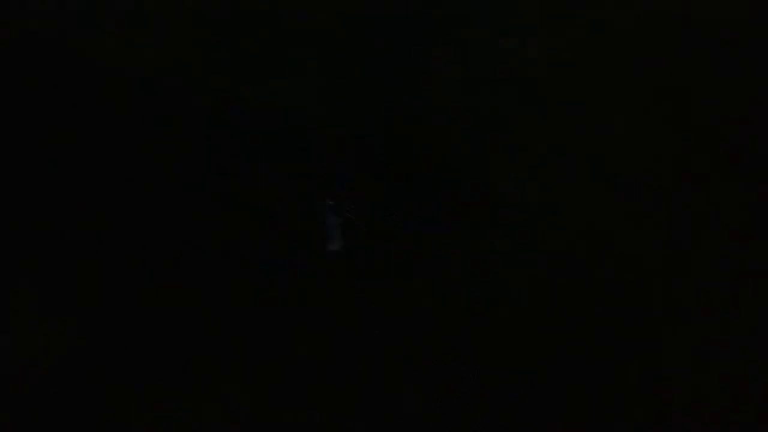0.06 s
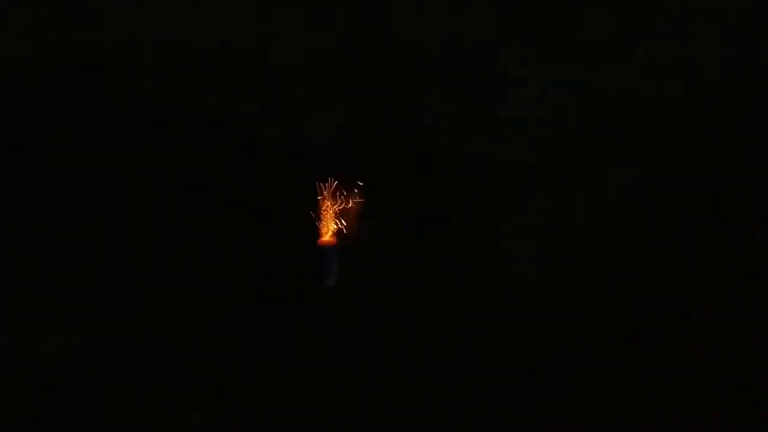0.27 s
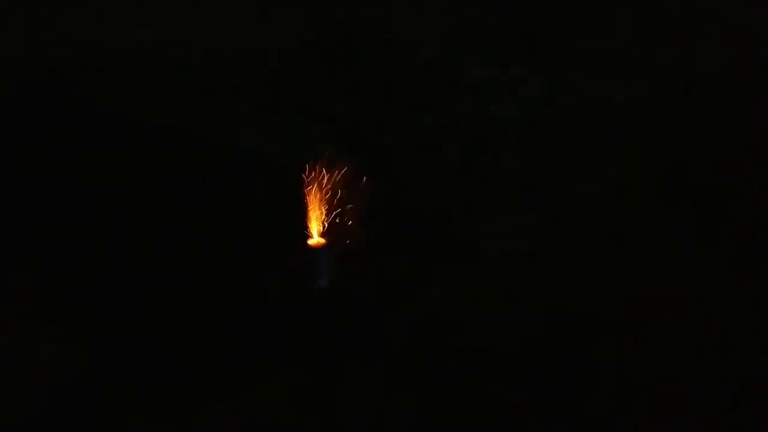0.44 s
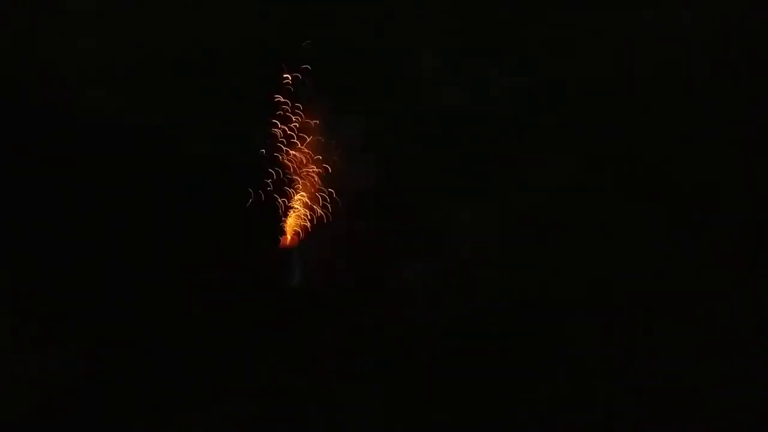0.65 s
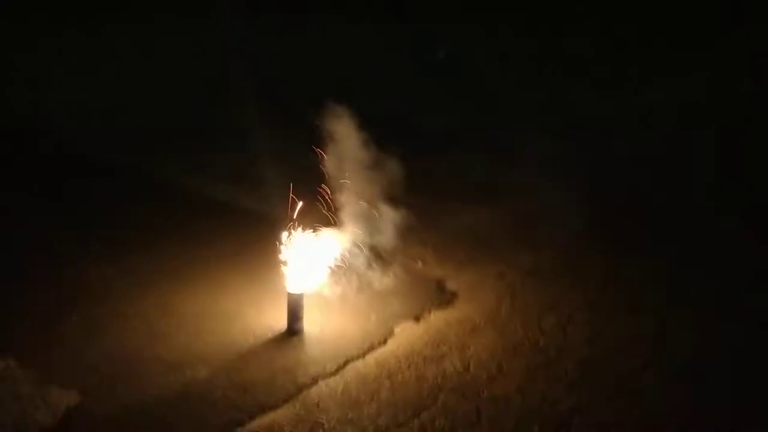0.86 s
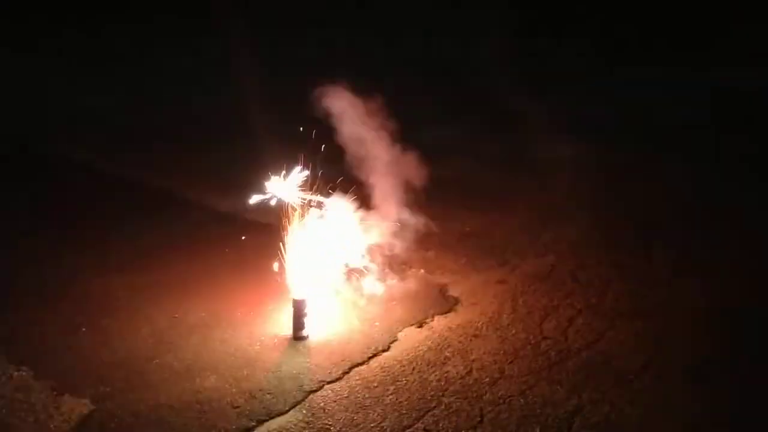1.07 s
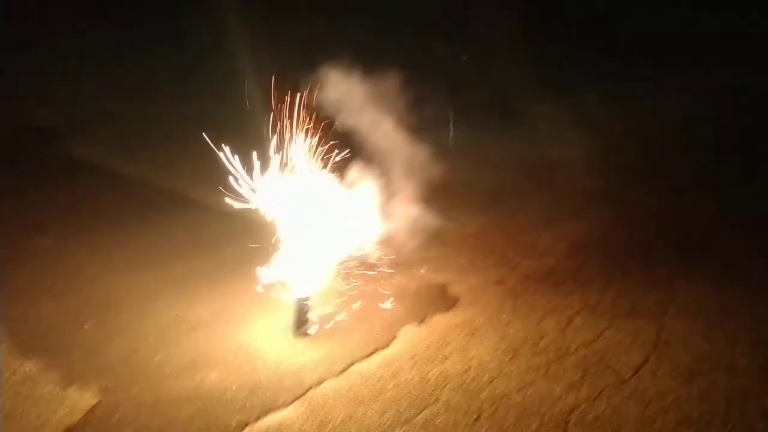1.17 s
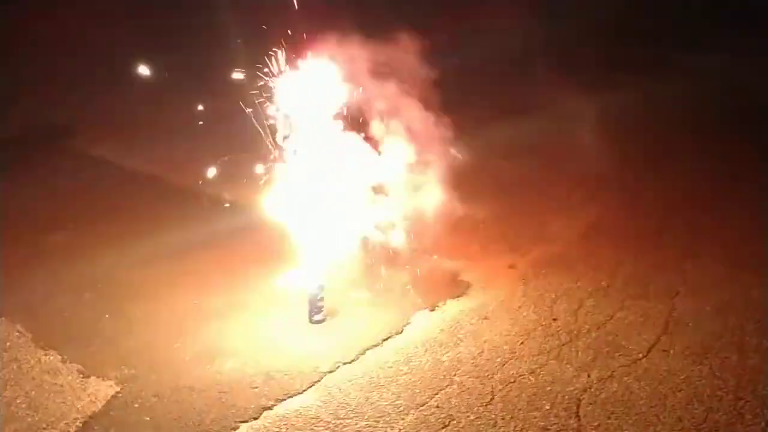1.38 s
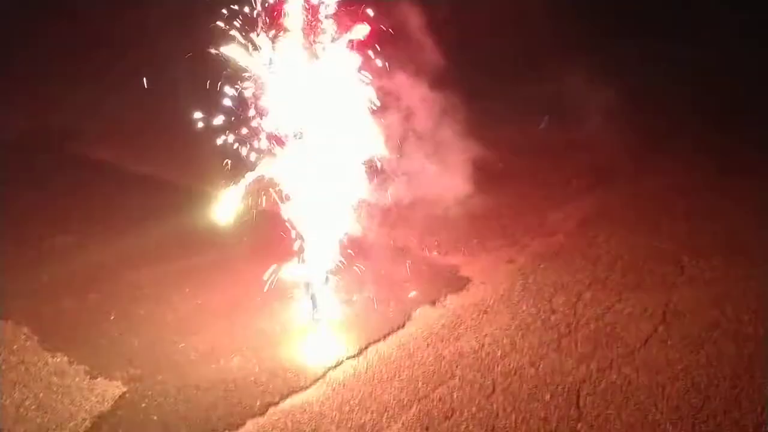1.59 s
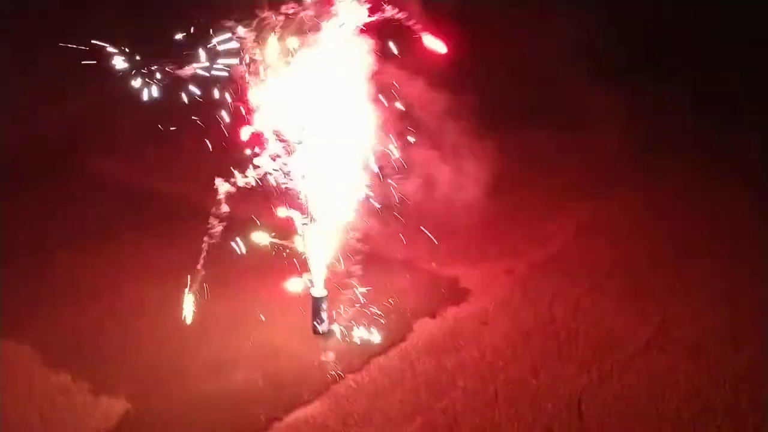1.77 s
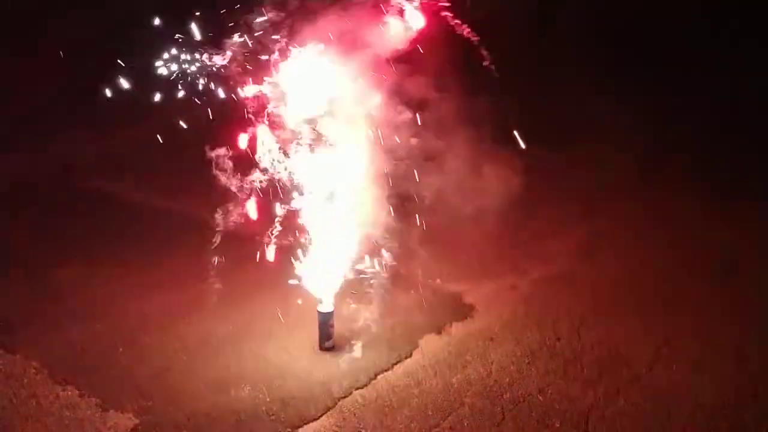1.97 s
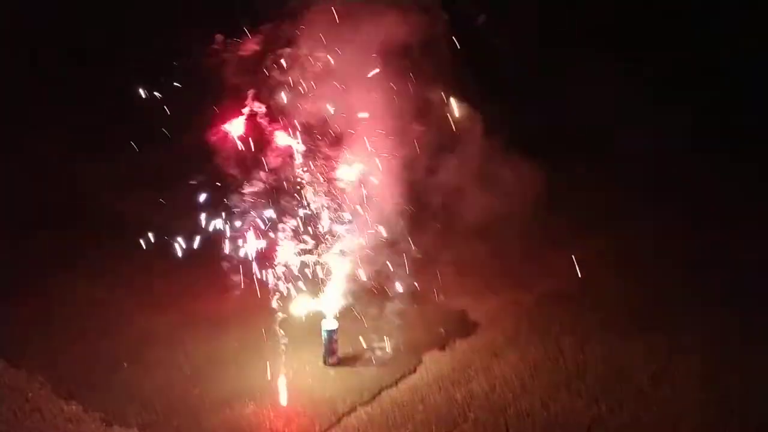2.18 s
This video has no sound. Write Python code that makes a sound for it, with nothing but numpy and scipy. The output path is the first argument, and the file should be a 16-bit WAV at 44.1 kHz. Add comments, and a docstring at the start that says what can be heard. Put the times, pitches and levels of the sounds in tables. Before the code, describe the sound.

Outdoors, a fuse spits and fades before a firework jet rushes up, hissing and sputtering with popping sparks; a loud crack bursts late, the hiss continues, with faint insects, distant traffic and wind buffets on the microphone.

```python
"""A firework fountain burns on asphalt at night, a little to the left of a pair of microphone ports.
The fuse flares and fades, then the main jet builds: shaped noise for hiss, middle band and lumpy low roar,
decaying tones for puffs, ringing clicks for spark snaps. One star bursts with a sharp crack and a noise tail.
The ground returns a short echo of jet, puffs and snaps, and several of the crack.
Air buffets each port with low noise and thuds; steady shaped noise makes insects and far traffic."""
import sys
import numpy as np
from scipy import signal
from scipy.fft import rfft, irfft, next_fast_len
from scipy.io import wavfile
from scipy.ndimage import uniform_filter1d, map_coordinates

SR = 44100
rng = np.random.default_rng(int(sys.argv[2]) if len(sys.argv) > 2 else 0)


def int16_out(signal):
    """Quantize to a 16-bit WAV file."""
    q = np.round(np.clip(np.atleast_2d(signal).T, -1, 1) * 32767)
    wavfile.write(sys.argv[1], SR, q.astype(np.int16))


N = 98563  # length [samples]

# Spectrum shape of the bright hiss: (frequency [Hz], relative level [dB])
HISS_SHAPE = [(3500, -23), (4500, -8), (5500, -8.5), (7000, -3.5), (9000, -3), (10500, 2), (12500, 2),
              (14500, 0.5), (16000, -5)]
# Spectrum shape of the jet's middle band: (frequency [Hz], relative level [dB])
MIDDLE_SHAPE = [(450, -25), (700, -2), (1000, -3), (1500, 6.5), (2200, -2), (3200, 3), (3800, -1),
                (5000, -40), (6500, -4.5)]
# Left-right likeness of the fountain's noise: (frequency [Hz], correlation [-1 to 1])
JET_ALIKE = [(300, 0.98), (800, 0.79), (3000, 1), (6000, 0.07), (15000, 0.3)]
GROUND_S = .00143  # delay of the bounce off the asphalt
LEAD_S, CRACK_LEAD_S = 0.00016, .000105  # how far the left port leads at high frequencies


def amp(db):
    """Decibels to amplitude."""
    return 10 ** (np.asarray(db) / 20)


def unit(x):
    """Scale to an rms of 1."""
    return x / np.sqrt(np.mean(x ** 2) + 1e-20)


def along(points, hz):
    """Interpolate (frequency [Hz], value) points on a log frequency axis."""
    f, v = np.transpose(points)
    return np.interp(np.log(hz + 1), np.log(f + 1), v)


def curves(rows, before_db=-100):
    """One value per sample for each column after the time."""
    s, *columns = np.transpose(rows)
    return [np.interp(np.arange(N) / SR, s, c, left=before_db) for c in columns]


def wobble(rate):
    """A smooth random curve, rate knots a second."""
    knots = rng.standard_normal(int(N * rate / SR) + 4)
    return map_coordinates(knots, [np.arange(N) * rate / SR])


def filtered(x, response):
    """Multiply the spectrum of x by a complex response of frequency."""
    m = next_fast_len(N + 8192)
    return irfft(rfft(x, m) * response(np.fft.rfftfreq(m, 1 / SR)), m)[..., :N]


def rush(spectrum, alike, patchy_db):
    """Stereo noise of rms 1, with random gain patches in time and frequency common to both ports."""
    z = signal.stft(rng.standard_normal((2, N)), nperseg=256)[2]
    field = uniform_filter1d(rng.standard_normal(z.shape[1:]), size=6, axis=0)
    field = uniform_filter1d(field, size=8, axis=1)
    pair = signal.istft(z * amp(patchy_db * unit(field)), nperseg=256)[1][:, :N]

    def shape(hz):
        # sum and difference of the shares give the wanted left-right correlation
        turn = np.arccos(np.clip(along(alike, hz), -1, 1)) / 2
        return amp(along(spectrum + [(SR / 2, -120)], hz)) * [np.cos(turn), np.sin(turn)]

    common, opposed = filtered(pair, shape)
    return unit(np.array([common + opposed, common - opposed]))


def night():
    """Far traffic and narrow bands of insects: steady noise, slightly louder on the right."""
    # Spectrum shape of the place: (frequency [Hz], relative level [dB])
    night_shape = [(40, -23), (90, 2), (150, -10), (220, -24), (320, -20), (520, -29), (700, 4), (1000, 1),
                   (1500, -6.5), (2500, -13), (3250, -5.5), (3800, -21), (6200, -12), (7500, -24),
                   (8600, -7), (8950, 3), (9400, -19), (12000, -28), (15000, -9.5)]
    night_db, right_db = -61.5, 0.5  # right_db is added on the right
    level = amp(night_db + np.array([[0], [right_db]]))
    return level * rush(night_shape, [(100, 1.0), (600, 0.07), (4000, 0.023)], patchy_db=-1.15)


def buffeting():
    """Moving air rumbles and thuds on each port: lumpy low noise and short low pulses."""
    # Rumble in two stretches: (time [s], level before a gain of 1.49 [dB], left minus right [dB])
    rumble_levels = [
        [(0.0, -66, -9), (0.28, -89, 9), (0.396, -46, 32), (0.462, -60, 15.5), (0.548, -47, 20),
         (0.636, -47.5, -5), (0.73, -54.5, -16), (0.962, -75, -10), (1.1, -52.5, 18), (1.278, -59, -5),
         (1.38, -45.5, 5), (1.572, -64, 16), (1.6, -47, -1)],
        [(1.67, -44.5, 0), (1.738, -43.5, -2.5), (1.8, -50.5, 2), (1.838, -60, -15), (1.878, -49.5, 1),
         (1.902, -41.5, 1), (1.932, -48, 4), (1.97, -37.5, 4), (2.008, -49.5, 12), (2.032, -51, 5),
         (2.15, -78, -7), (2.23, -76, -4)],
    ]
    # Spectrum shape of the rumble: (frequency [Hz], relative level [dB])
    air_shape = [(25, -42), (45, -10), (70, 0.5), (110, 3.5), (170, 1), (250, -14), (400, -20), (800, -78)]
    # Single thuds of air: (time [s], envelope peak [dB], left minus right [dB], pitch [Hz])
    thuds = [(0.011, -44, 4, 84.5), (0.395, -32, 36, 98), (0.5781, -20.5, 39, 155),
             (0.607, -28.5, -27, 164), (0.709, -34, -23, 105), (1.39, -27.5, 16, 126), (1.97, -29, 2, 130)]
    thud_lag_rad, thud_narrow = 1.9, 5.5  # a higher thud_narrow shortens each thud

    def ports(pan_db):
        return np.array([1 / (1 + amp(-pan_db)), 1 / (1 + amp(pan_db))])

    level_db, pan_db = curves(rumble_levels[0] + rumble_levels[1])
    lumps = amp(3.2 * np.array([wobble(27.87), wobble(28.5)]))
    rumble = unit(lumps * rush(air_shape, [(100, 0.94)], patchy_db=3.0))
    out = 1.49 * amp(level_db) * ports(pan_db) * rumble
    for s, db, pan, hz in thuds:
        cycles = (np.arange(N) / SR - s) * hz
        pulse = np.cos(2 * np.pi * cycles - thud_lag_rad) * np.exp(-thud_narrow * cycles * cycles)
        out = out - amp(db) * ports(pan)[:, None] * pulse
    return out


def snapped(clicks):
    """Clicks given a brief ring: parallel resonances plus some bare click."""
    # Resonances of a snap: (centre [Hz], width [Hz], gain [dB])
    snap_modes = [(1623, 680, 3), (2390, 2450, 0.5), (7430, 710, 1), (12600, 8100, 6.5)]

    def ring(f):
        modes = [amp(db) * 1j * f * w / (c * c - f * f + 1j * f * w) for c, w, db in snap_modes]
        return 0.23 + sum(modes)

    return filtered(clicks, ring)


def jet():
    """Burning gas: hiss, middle band and roar flutter partly together; the middle sputters, sparks pepper it."""
    # Hiss and middle band: (time [s], hiss level [dB], middle band level [dB])
    jet_levels = [(.24, -99, -73), (.3, -65, -65.5), (.37, -52, -53), (.425, -47.5, -49.5), (.45, -46, -55),
                  (.47, -33.5, -48), (.49, -38, -53), (.525, -36.5, -52), (.545, -50, -53.5),
                  (.58, -52.5, -55), (.62, -51, -48.5), (.64, -44.5, -50), (.66, -54.5, -49),
                  (.8, -54.5, -64), (.95, -51, -56), (1.0, -45, -52), (1.09, -45, -50.5),
                  (1.13, -45.5, -47.5), (1.17, -42.5, -46), (1.25, -35.5, -40.5), (1.28, -37, -45),
                  (1.42, -35, -43.5), (1.6, -32.5, -41.5), (1.705, -28, -41.5), (1.74, -30.5, -44.5),
                  (1.8, -31, -43.5), (1.92, -34.5, -46), (1.962, -28, -35), (2.0, -36, -45),
                  (2.04, -31, -41.5), (2.065, -35, -45.5), (2.23, -34.5, -46.5)]
    # Low roar: (time [s], level before a 6.5 dB lift [dB])
    roar_levels = [(0.34, -86), (0.424, -57.5), (0.544, -64), (0.68, -56.5), (0.782, -101), (1.018, -76),
                   (1.066, -53), (1.16, -65.5), (1.208, -56), (1.576, -51), (1.744, -54), (1.882, -60.5),
                   (2.04, -56.5), (2.23, -66)]
    # Spectrum shape of the roar: (frequency [Hz], relative level [dB])
    low_shape = [(40, -57), (110, -8), (250, -6), (400, 8), (520, -2), (750, -49), (1500, -67)]
    flutter_db, slow_flutter, roar_lumps_db = .9, .25, 2.6
    sputters_per_s, sputter_db, sputter_s = 110, -7, .003  # sputter_s is the decay time constant
    sparks_per_s = 600
    spark_db, spark_spread_db, spark_most_db = 4, 3, 9  # over the hiss level

    hiss_db, middle_db = curves(jet_levels)
    roar_db, = curves(roar_levels)
    flutter = wobble(35.13) + slow_flutter * wobble(14.9)
    hiss_gain = amp(hiss_db + flutter_db * flutter + .8 * wobble(70))
    hiss = hiss_gain * rush(HISS_SHAPE, JET_ALIKE, patchy_db=1.2)

    middle_gain = amp(middle_db + 0.55 * flutter_db * flutter + 1.2 * wobble(49.82))
    middle = middle_gain * rush(MIDDLE_SHAPE, JET_ALIKE, patchy_db=2.0)
    spits = (rng.random(N) < sputters_per_s / SR) * rng.exponential(size=N)
    sputter = signal.lfilter([1], [1, -np.exp(-1 / (sputter_s * SR))], spits)
    middle = middle * (1 + amp(sputter_db) * sputter)

    roar_gain = amp(roar_db + 6.5 + 0.89 * flutter + roar_lumps_db * wobble(45.4))
    roar = roar_gain * rush(low_shape, JET_ALIKE, patchy_db=2.5)

    lit = rng.random(N) < sparks_per_s / SR
    spread_db = np.minimum(spark_spread_db * rng.exponential(size=N), spark_most_db)
    sparks = lit * amp(hiss_db + spark_db + spread_db)
    return hiss + middle + roar + snapped(sparks)


def bursts():
    """Spark snaps ring with a short fizz; puffs of gas are decaying tones with a rasp and weaker later pops."""
    # Spark snaps: (time [s], level before the snap, fizz and rasp offsets [dB])
    snaps = [(.3775, -28), (.4338, -19), (.4445, -24), (.4474, -19), (.6005, -24), (.604, -26),
             (.9025, -31), (1.063, -28.5), (1.097, -29.5), (1.2486, -18), (1.393, -22.5), (1.784, -20.5),
             (1.899, -26.5), (1.955, -19.5), (2.0393, -20.5), (2.0423, -19.5), (2.169, -30)]
    # Puffs of gas: (time [s], level before the tone and rasp offsets [dB], pitch [Hz])
    puffs = [(0.4074, -36.5, 447), (0.414, -38.5, 433), (0.4437, -30.5, 407), (1.029, -40, 800),
             (1.034, -36.5, 467), (1.055, -33.5, 497), (1.064, -33, 440), (1.085, -36, 780),
             (1.097, -41, 840), (1.207, -40, 706), (1.2317, -24.5, 396), (1.301, -41, 394),
             (1.335, -27.5, 366), (1.397, -32.5, 483), (1.58, -33, 423), (1.686, -33.5, 332),
             (1.712, -32.5, 304), (1.741, -31, 274), (1.899, -35.5, 385), (1.952, -32.5, 281),
             (2.041, -26.5, 368), (2.166, -36.5, 513)]
    snap_db, fizz_db, fizz_t60_s = -0.5, -10.5, .009
    snap_rasp_db, snap_rasp_t60_s = -9, .025
    puff_db, puff_cycles, puff_cut_hz = 4.5, 1.04, 136  # the tone falls by 1/e in puff_cycles
    rasp_db, rasp_t60_s = -14, 0.029
    ragged_s, ragged_db = .009, -7  # latest delay of the pops; each is one to two times ragged_db weaker

    clicks, rasp, tones = np.zeros(N), np.zeros(N + SR), np.zeros(N + SR)
    t = np.arange(SR // 8) / SR
    for s, db in snaps:
        start = round(s * SR)
        clicks[start] = amp(db + snap_db)
        fizz = amp(db + fizz_db - 60 * t[:900] / fizz_t60_s) * rng.standard_normal(900)
        clicks[start + 1:][:900] += fizz
        rasp[start:][:len(t)] += amp(db + snap_rasp_db - 60 * t / snap_rasp_t60_s)

    # two pops after each puff, at random delays, levels and pitches
    pops = []
    for (s, db, hz), pair in zip(puffs, rng.random((len(puffs), 2, 2))):
        for k, (a, b) in enumerate(pair):
            pops.append((s + ragged_s * (k + a) / 2, db + ragged_db * (1 + a), hz * 2 ** (2 * b - .5)))
    for s, db, hz in puffs + pops:
        start = round(s * SR)
        decay = np.exp(-t * hz / puff_cycles)
        tones[start:][:len(t)] += amp(db + puff_db) * np.sin(2 * np.pi * hz * t) * decay
        rasp[start:][:len(t)] += amp(db + rasp_db - 60 * t / rasp_t60_s)

    body = filtered(tones[:N], lambda f: (1j * f / (puff_cut_hz + 1j * f)) ** 2)
    return body + snapped(clicks) + rasp[:N] * rush(MIDDLE_SHAPE, JET_ALIKE, patchy_db=5.5)


def placed(x, echo_db, lead_s):
    """One bounce off the ground, then the path to each port: the right differs in tone and lags."""
    # Tone at the right port: (frequency [Hz], right over left [dB])
    right_tone = [(400, -1.5), (700, -1.5), (1500, -1.9), (2300, 3), (3300, 2.5), (5000, -3.5), (9000, -1),
                  (15000, 2)]
    lead_from_hz = 1760  # well below this both ports hear nearly in step

    def path(hz):
        echo = amp(echo_db) * np.exp(-2j * np.pi * hz * GROUND_S)
        lag_s = lead_s * hz ** 2 / (hz ** 2 + lead_from_hz ** 2)
        right = amp(along(right_tone, hz)) * np.exp(-2j * np.pi * hz * lag_s)
        return (1 + echo) * np.array([np.ones_like(hz), right])

    return filtered(x, path)


def crack():
    """A star bursts: a shrill snap and its echoes, a pressure push and its rebound, then scattered echoes."""
    crack_s = 1.6251
    ring_db, ring_hz, ring_s, click_db, echo_db = 7, 13600, .0002, 5, -4
    # Pressure push, rows left and right: (decay time constant [s])
    push_s = [
        [.0009],
        [.0022],
    ]
    # Pressure push, rows left and right: (level [dB])
    push_db = [
        [-4],
        [-1],
    ]
    # Underpressure after the push, rows left and right: (decay time constant [s])
    suck_s = [
        [0.0011],
        [0.0078],
    ]
    # Underpressure, rows left and right: (level relative to the push [dB])
    suck_db = [
        [-5.5],
        [-6],
    ]
    tail_db, tail_t60_s = -12, 0.13  # hiss in the scattered echoes
    scatter_db, scatter_t60_s = -17, 0.03  # their middle band

    def fall(u, life):
        return (u >= 0) * np.exp(-np.abs(u) / life)

    t = np.arange(N) / SR - crack_s
    late = t - GROUND_S
    snap = amp(ring_db) * fall(t, ring_s) * np.sin(2 * np.pi * ring_hz * t)
    snap = snap + snapped(amp(click_db) * (np.arange(N) == round(crack_s * SR)))
    # with the single bounce in placed(), this makes three echoes
    snap = snap + amp(2 * echo_db) * np.roll(snap, round(2 * GROUND_S * SR))
    push = amp(push_db) * (fall(t, np.array(push_s)) - amp(suck_db) * fall(late, np.array(suck_s)))
    tail_gain = amp(tail_db) * fall(late, tail_t60_s / np.log(1000))
    tail = tail_gain * rush(HISS_SHAPE, JET_ALIKE, patchy_db=2.5)
    scatter_gain = amp(scatter_db) * fall(late, scatter_t60_s / np.log(1000))
    scatter = scatter_gain * rush(MIDDLE_SHAPE, JET_ALIKE, patchy_db=1)
    # -100 dB leaves the push and scattered echoes practically without a bounce
    return placed(snap, echo_db, CRACK_LEAD_S) + placed(push + tail + scatter, -100, CRACK_LEAD_S)


def scene():
    """The place, the air on the ports and the fountain, summed at the ports."""
    fountain = placed(jet(), -18.5, LEAD_S) + placed(bursts(), -11, LEAD_S) + crack()
    return night() + buffeting() + fountain


def record(dry):
    """Resonant bass cut, a gain that ducks briefly after loud sound, a soft ceiling and the band limit."""
    cut_hz, cut_q = 58.3, 0.98  # of each of two equal stages
    duck_above_db, duck_share, duck_s = -20.5, 0.59, 0.034  # duck_share: dB of cut per dB over
    ceiling, top_hz = 1.1, 16000

    def bass_cut(f):
        return (f * f / (cut_hz * cut_hz - f * f + 1j * f * cut_hz / cut_q)) ** 2

    x = filtered(dry, bass_cut)
    size = int(duck_s * SR)
    power = signal.lfilter(np.ones(size) / size, 1, np.mean(x ** 2, axis=0))  # mean of the last duck_s
    over_db = np.maximum(10 * np.log10(np.abs(power) + 1e-12) - duck_above_db, 0)
    x = x * amp(-duck_share * over_db)
    x = x / (1 + np.abs(x / ceiling) ** 6) ** (1 / 6)
    return filtered(x, lambda hz: hz < top_hz)


dry = scene()
out = record(dry)
int16_out(out)
```